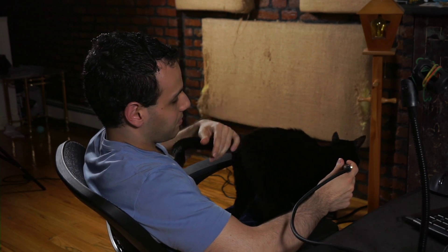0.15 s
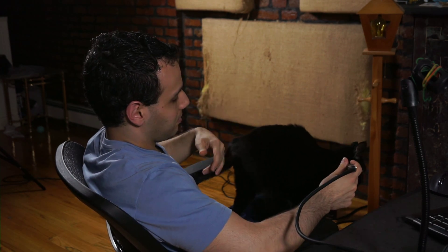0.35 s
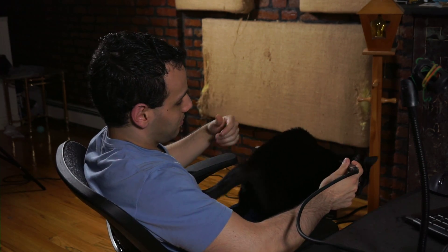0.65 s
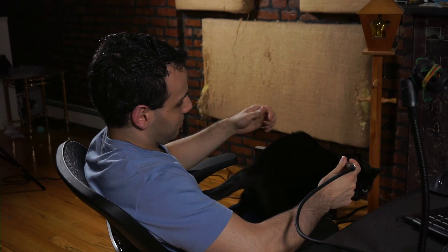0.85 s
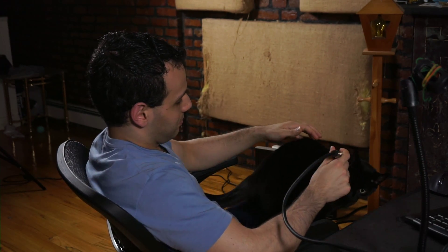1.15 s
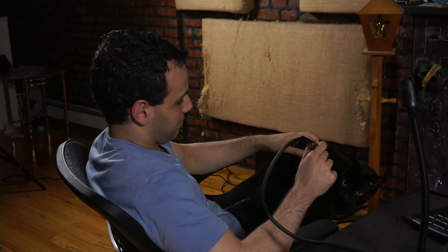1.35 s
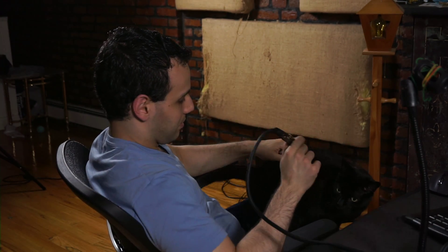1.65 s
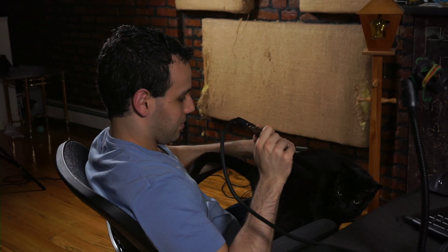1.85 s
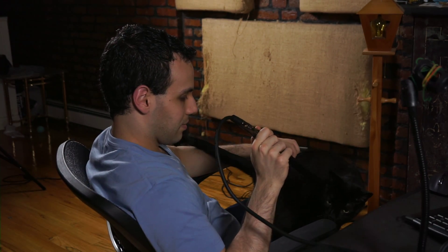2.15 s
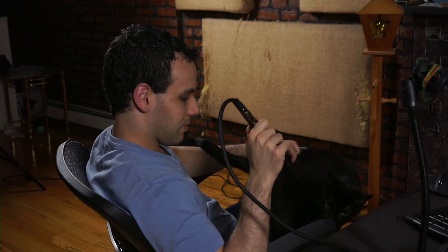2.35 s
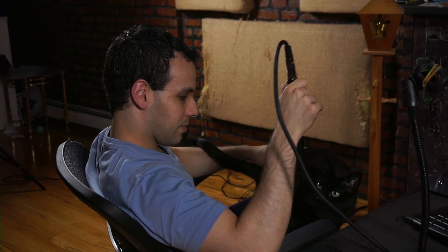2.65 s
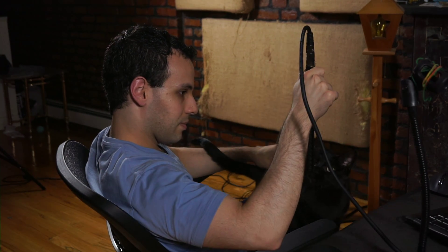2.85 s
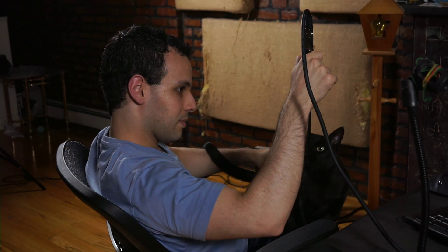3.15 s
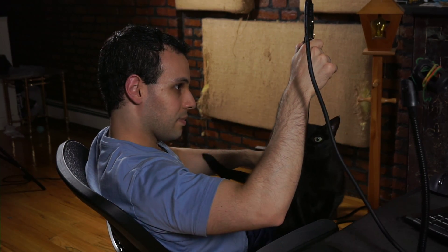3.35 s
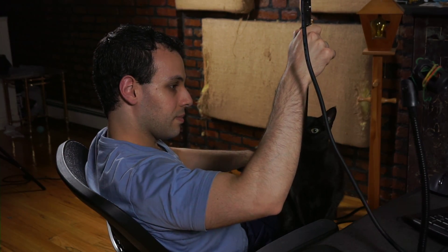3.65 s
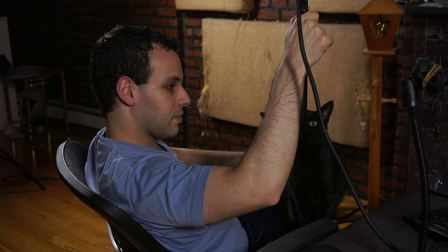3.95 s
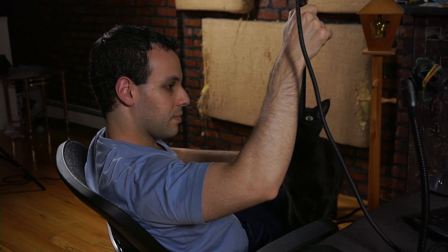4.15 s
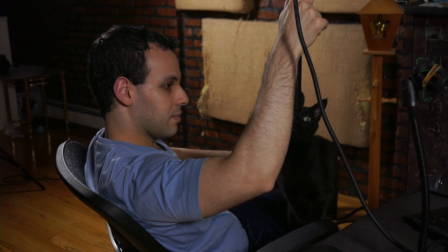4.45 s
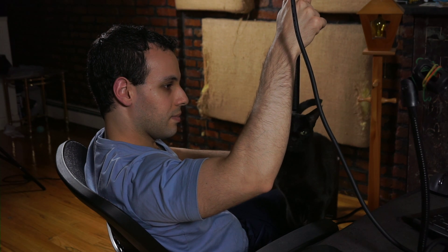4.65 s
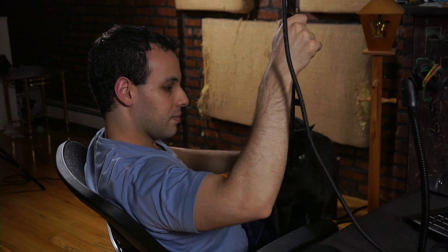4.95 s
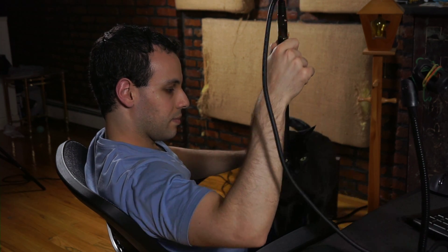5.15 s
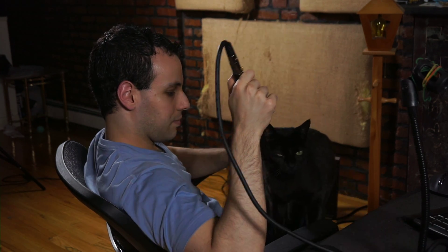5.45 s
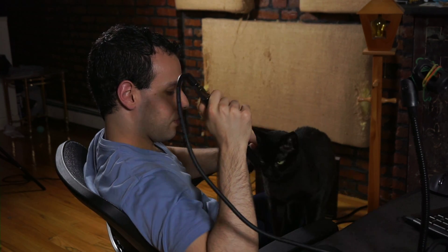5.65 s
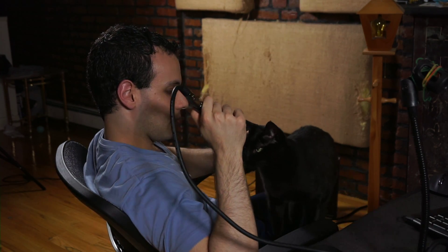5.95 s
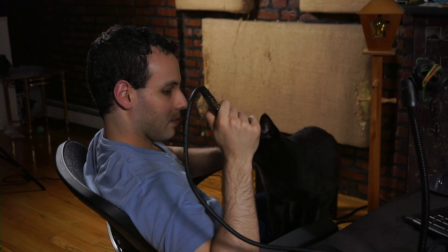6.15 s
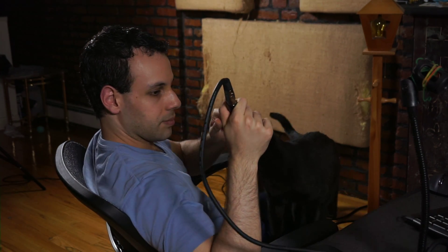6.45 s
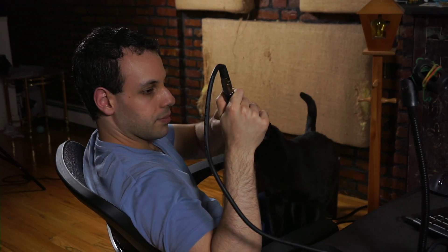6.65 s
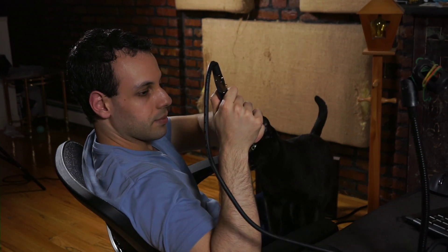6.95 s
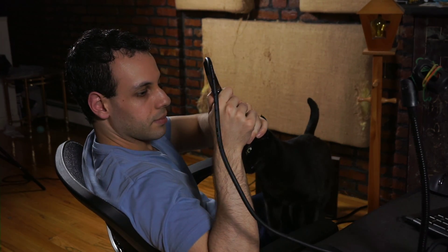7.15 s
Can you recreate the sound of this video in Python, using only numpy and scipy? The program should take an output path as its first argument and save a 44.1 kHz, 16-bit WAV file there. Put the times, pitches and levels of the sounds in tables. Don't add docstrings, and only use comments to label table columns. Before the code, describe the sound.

A handheld microphone brushes a cat's fur in a quiet room: soft rubbing, a hard bump and only faint purring at first. Pressed closer, the purr becomes a strong, rumbling flutter, alternating breath in and out. Three tiny squeaks come in quick succession, meeting a deep thud, then purring continues under shifting, scraping and final clicks and bumps.

```python
import sys
import numpy as np
from scipy import signal
from scipy.io import wavfile
from scipy.ndimage import uniform_filter1d, minimum_filter1d

SR = 44100
rng = np.random.default_rng(int(sys.argv[2]) if len(sys.argv) > 2 else 0)


def invert_db(x):
    u = np.asarray(x, float) / 20
    return 10 ** u


def wrap_up_sound(samples):
    columns = np.atleast_2d(samples).T
    tamed = np.clip(columns, -1, 1)
    steps = np.round(tamed * 32767).astype(np.int16)
    wavfile.write(sys.argv[1], SR, steps)


N = 322004


def evened(x):
    return x / np.sqrt(np.mean(x ** 2) + 1e-20)


def read(points, hz):
    f, value = np.transpose(points)
    return np.interp(np.log(hz + 1), np.log(f + 1), value)


def add(mix, s, sound):
    part = mix[round(s * SR):][:len(sound)]
    part += sound[:len(part)]


def resonate(x, hz, width):
    r = np.exp(-np.pi * width / SR)
    return 2 * signal.lfilter([1 - r], [1, -r * np.exp(2j * np.pi * hz / SR)], x + 0j).real


def band(x, lo_hz, hi_hz):
    return signal.sosfilt(signal.butter(2, [lo_hz, hi_hz], "band", fs=SR, output="sos"), x)


def noise(spectrum, size, patchy_db, flicker_db):
    frames, hz = 4 * N // size + 8, np.fft.rfftfreq(size, 1 / SR)
    a, b, patches = rng.standard_normal((frames, len(hz), 3)).T
    patches = evened(uniform_filter1d(uniform_filter1d(patches, 8, 0), 8, 1))
    flicker = evened(uniform_filter1d(rng.standard_normal(frames), 3))
    level_db = read(spectrum, hz)[:, None] + patchy_db * patches + flicker_db * flicker
    z = (a + 1j * b) * invert_db(level_db)
    return evened(signal.istft(z, nperseg=size, noverlap=size * 3 // 4)[1][:N])


def held(start, end, start_db, end_db, rest_db, rise_db_per_s, fall_db_per_s):
    t = np.arange(0, N + 64, 64)[:, None] / SR
    hold_db = start_db + (end_db - start_db) * np.clip((t - start) / (end - start), 0, 1)
    db = hold_db - rise_db_per_s * np.maximum(start - t, 0) - fall_db_per_s * np.maximum(t - end, 0)
    total_db = 10 * np.log10((invert_db(db) ** 2).sum(1) + invert_db(rest_db) ** 2)
    return np.interp(np.arange(N) / SR, t[:, 0], total_db)


def thump(t, hz, t60, ring_db, swell, slam):
    rise = swell * np.exp(-((t + .0035) / .0015) ** 2)
    dip = -slam * np.exp(-(t / .0014) ** 2)
    onset = 1 / (1 + np.exp(-(t + 0.00022) / 0.0035))
    ring = -np.cos(2 * np.pi * hz * t) * invert_db(ring_db - 60 * np.maximum(t, 0) / t60) * onset
    return rise + dip + ring * np.cos(np.pi / 2 * (t / t[-1]) ** 2)


def flutter(t, hz, width, overtone, phase):
    swing = 2 * np.pi * hz * t - phase
    wave = np.cos(swing) - overtone * np.cos(2 * swing)
    fade = np.cos(np.pi / 2 * t / t[-1]) * np.exp(-np.pi * width * t)
    return -wave * fade * (1 - np.exp(-t / 0.0033))


def purr(low_db, sway_db):
    # first pulse t/s, last pulse t/s, 1 = in and 0 = out, purr share of the low sound [0-1]
    breaths = [ (.4318, .6329, 0, .6), (.9927, 1.2591, 1, .6), (1.7364, 1.8583, 0, .6),
               (2.1669, 2.3273, 0, .7), (2.4590, 2.7264, 1, .75), (2.7501, 3.2308, 0, .995),
               (3.2500, 3.4379, 1, .995), (3.5006, 3.7901, 0, .995), (3.8050, 4.1505, 1, .99),
               (4.2138, 4.5015, 0, .995), (4.5600, 4.9042, 1, .85), (4.9305, 5.3400, 0, .93),
               (5.3798, 5.5260, 1, .8), (5.8055, 6.0083, 0, .98), (6.1300, 6.5099, 1, .9),
               (6.8261, 7.0690, 0, .85), (7.1071, 7.1815, 1, .8)]
    # soft flap level/dB, sharp flap level/dB, gated breath level/dB
    breath_tone = [(-27, -46, -45), (0.5, -33, -51), (-24, -18, -45), (-12, -35, -45), (4, -1.5, -30.5),
                   (-3, -26, -35.5), (-1.5, -18.5, -45), (-7.5, -47, -48), (-3.5, -14.5, -43),
                   (-10.5, -32, -53.5), (-23, -6, -18), (-17, -46, -34), (-19, -25, -44.5), (-8, -35, -47),
                   (-31, -43, -50), (-36, -27.5, -37.5), (-31, -27, -29)]
    # f/Hz, t60/s, ring level/dB, swell [ratio], slam [ratio]
    chest_modes = [(71.3, 0.056, 9, 1, 0.77), (73, 0.13, 12, 0.86, 2.6)]
    # f/Hz, width/Hz, overtone share [0-1]
    soft_edges = [(195.8, 76, 0.47), (417, 158, 0.034)]
    # f/Hz, width/Hz, level/dB
    throat_modes = [(770, 550, 9), (1303, 140, 8), (3760, 510, -6.5), (5870, 2300, -13.5),
                    (7800, 840, -20.5), (2220, 950, -15.5)]
    # lead/s, length/s, soft share of the edges [0-1], fade level/dB over the breath
    puffs = [(.002, 0.028, 0.34, -6), (.014, 0.029, 1.0, 0)]
    pulse_rates = (24.7, 26.2)
    second_flaps = (-10, -8)
    # row, pip level/dB
    wheeze = (14, -13)

    thumps, heave, soft, flaps, gate, pips, share = (np.zeros(N) for _ in range(7))
    t, short = np.arange(-600, 4400) / SR, np.arange(700) / SR
    for row, ((first, last, inward, part), tone) in enumerate(zip(breaths, breath_tone)):
        soft_db, flap_db, air_db = tone
        cycles, second_db = round((last - first) * pulse_rates[inward]), second_flaps[inward]
        pip_db = wheeze[1] if row == wheeze[0] else air_db - 8
        hz, *shape = chest_modes[inward]
        period, breath = (last - first) / cycles, np.zeros(N)
        flap_hz, width, overtone = soft_edges[inward]
        lead_s, puff_s, edges, fade_db = puffs[inward]
        for k, chance in enumerate(rng.standard_normal((16, 5))[:cycles + 1]):
            s = first + k * period + .0006 * chance[4]
            beat = thump(t, hz * (1 + 0.066 * chance[0]), *shape)
            add(breath, s + t[0], invert_db(.5 * chance[1]) * beat)

            reopen = s + (.34 + .19 * inward) * period + 0.00042 * chance[2]
            rattle = np.zeros(240)
            slap_at = [0, 95, 190] + rng.integers(0, 30, 3)
            rattle[slap_at] = [.22, 1, .3] * invert_db(1.5 * rng.standard_normal(3))
            edge_db = -4.0 * (k == 0) - 21.0 * (k == cycles)
            later = .0145 + .002 * chance[1]
            flap = flutter(short, flap_hz * (1 + .12 * chance[2]), width, overtone, .5 * chance[0])
            strength_db = 1.3 * chance[3]
            for lag, db in ((0, strength_db), (later, second_db + 3.7 * chance[4])):
                add(soft, reopen + lag - .0035, invert_db(soft_db + db + edge_db) * flap)
                add(flaps, reopen + lag - .0025, invert_db(flap_db + db + edge_db) * rattle)

            puff = signal.windows.tukey(round(puff_s * SR), min(edges, 1)) ** 2
            puff_db = air_db + fade_db * (2 * k / cycles - 1) + 2 * chance[0]
            add(gate, reopen - lead_s, invert_db(puff_db) * puff)

            pip_hz = 740 + 170 * np.sin(np.pi * k / cycles * .8)
            pip = np.sin(2 * np.pi * pip_hz * short * (.94 + 10 * short)) * np.hanning(len(short))
            add(pips, s - .009, invert_db(pip_db + chance[3] + edge_db) * pip)
        span = slice(round((first - .01) * SR), round((last + period) * SR))
        thumps += part * breath / np.std(breath[span])
        turns = (np.arange(N)[span] / SR - first) / period - .3
        heave[span] = part * np.sqrt(2) * np.cos(2 * np.pi * turns)
        share[span] = part
    thumps = signal.filtfilt(*signal.butter(1, 30, "high", fs=SR), thumps)
    throat = sum(invert_db(db) * resonate(resonate(flaps, f, w), f, w) for f, w, db in throat_modes)
    hiss = band(rng.standard_normal(N), 1000, 1350) * 4
    hiss = hiss + band(rng.standard_normal(N), 3580, 4150) * 0.93
    hiss = hiss + band(rng.standard_normal(N), 5500, 7300)
    voiced = thumps + invert_db(10.0) * soft + invert_db(23.5) * throat + invert_db(3.5) * gate * hiss + pips
    cat = invert_db(low_db) * voiced + invert_db(sway_db) * uniform_filter1d(heave, 400)
    return cat, uniform_filter1d(share, 600)


def squeaks():
    events = [
        (5.562, 0.076, 757, -12.5, 1.5, 0.84),
        (5.669, .064, 763, -13.5, 2.5, .75),
        (5.774, .028, 906, -16.5, -4.5, 1),
    ]
    # share of its length [0-1], pitch over lowest pitch [ratio], level/dB
    full = [(0, 1.72, -36), (.09, 1.5, -24), (.13, 1.27, -2), (.23, 1.03, -1), (.33, 1.0, .5),
            (.51, 1.1, -2), (.6, 1.48, -2.5), (.76, 1.6, -16), (1, 1.66, -42)]
    broken = [(0, 1.02, -21.5), (.25, 1.025, 0), (.45, 1.02, -13.5), (.54, 1.19, -26), (.7, 1.2, -6),
              (1, 1.2, -40)]
    # f/Hz, level/dB
    body = [(700, 1.5), (1600, 1.5), (2300, 1), (3100, -5.5), (3900, -11), (4600, -8.5), (5400, -17.5),
            (6500, -23), (9000, -40), (16000, -36.5)]

    out = np.zeros(N)
    for (start, length, low_hz, top_db, tilt_db, sounded), shape in zip(events, (full, full, broken)):
        at, *columns = np.transpose(shape)
        t = np.arange(0, sounded * length, 1 / SR)
        ratio, under_db = (uniform_filter1d(np.interp(t / length, at, c), 90, mode="nearest") for c in columns)
        hz, level_db = low_hz * ratio, top_db + under_db
        bright_db = tilt_db + 0.52 * under_db
        wobble = uniform_filter1d(rng.standard_normal((2, 4000))[:, :len(t)], 40)
        turns = np.cumsum(hz * (1 + 0.18 * wobble[0])) / SR
        shimmer_db = 4.7 * uniform_filter1d(rng.standard_normal((20, 4000)), 200)[:, :len(t)]
        tone = np.zeros(len(t))
        for k in range(1, 20):
            partial_db = read(body, k * hz) + bright_db * np.log2(k) + shimmer_db[k]
            tone += invert_db(partial_db) * (k * hz < 16000) * np.cos(2 * np.pi * k * turns + .7 * k * k)
        tone /= np.sqrt(uniform_filter1d(tone ** 2, 300))
        leak = band(rng.standard_normal(4000)[:len(t)], 1500, 9900)
        tone = tone * (1 + .8 * wobble[1]) + 0.044 * leak
        add(out, start, invert_db(level_db) * tone * signal.windows.tukey(len(t), .1))
    t = np.arange(5000) / SR
    echo = band(rng.standard_normal(5000), 450, 5000) * invert_db(-60 * t / 0.15)
    return out + invert_db(-39.0) * signal.oaconvolve(out, echo / np.linalg.norm(echo))[:N]


def handling(low_db, sway_db, share):
    # start t/s, end t/s, rub level/dB, scrape level/dB, hiss level/dB
    slides = [(0, -0.018, -39, -49, -56.5), (0.077, 0.333, -49.5, -63.5, -66),
              (0.468, 0.66, -53.5, -67, -71), (0.698, 0.919, -45.5, -54.5, -55),
              (0.992, 1.066, -50.5, -59, -60), (1.167, 1.245, -44, -63.5, -62.5),
              (1.605, 1.65, -68, -60, -75), (1.722, 1.773, -53, -53, -70.5),
              (1.841, 1.895, -55, -58.5, -61.5), (1.975, 1.968, -59, -53, -59),
              (2.016, 2.335, -60.5, -66.5, -69.5), (2.404, 2.413, -44.5, -51.5, -64.5),
              (2.492, 3.14, -64, -68, -68.5), (3.268, 3.434, -45, -70, -71.5),
              (3.59, 4.049, -72, -68.5, -76.5), (4.595, 4.855, -68, -65.5, -73.5),
              (5.317, 5.505, -75, -84, -74.5), (5.541, 5.539, -56, -50.5, -65.5),
              (5.76, 5.804, -64, -60, -61.5), (5.859, 5.952, -57, -73, -82.5),
              (6.02, 6.071, -47.5, -55.5, -55.5), (6.12, 6.352, -56, -64, -66.5),
              (6.74, 6.776, -49.5, -60.5, -69.5), (6.847, 6.9, -45.5, -46.5, -62.5),
              (6.914, 6.968, -35, -45.5, -65), (6.964, 7.108, -46, -41.5, -65),
              (7.15, 7.173, -37.5, -73, -64), (7.231, 7.219, -25.5, -33, -55),
              (7.258, 7.297, -39, -37, -55)]
    # rub level/dB, scrape level/dB, hiss level/dB
    slide_rest = (-59, -73, -77)
    # f/Hz, level/dB per Hz
    rumble_spectrum = [(18, -8), (30, -7.5), (65, 4.5), (92, 1.5), (288, -9.5), (423, -21), (495, -27.5),
                       (781, -37.5), (900, -56), (1170, -93), (1980, -120)]
    # f/Hz, level/dB
    rub_spectrum = [(150, -18.5), (250, 5), (398, 4.5), (490, -9), (715, -4.5), (954, -9), (1700, -24.5),
                    (2210, -45), (3740, -120)]
    # f/Hz, level/dB
    scrape_spectrum = [(880, -3.5), (1500, 0.5), (1900, -7.5), (2190, -3.5), (3460, -14), (4460, -6),
                       (4900, -18), (5630, -10), (6000, -29.5), (7800, -59), (13200, -120)]
    # f/Hz, level/dB
    hiss_spectrum = [(2940, -47.5), (5000, 1.5), (5300, -13.5), (5820, 5.5), (6520, 3), (12200, -0.5),
                     (13600, -1), (14100, -0.5), (14600, -4), (15600, -3), (16000, -5)]
    # start t/s, end t/s
    over_capsule = [(0, 1.33), (5.75, 6.4)]
    # start t/s, end t/s, f/Hz, width/Hz, level/dB
    whistles = [
        (0, 0.613, 4930, 250, -72.5),
        (1.726, 1.787, 2120, 88, -54),
        (1.798, 2.15, 2120, 59, -72),
        (5.403, 6.606, 624, 25.5, -68.5),
        (6.813, 7.3, 13300, 2600, -67),
    ]

    start, end, *levels = np.transpose(slides)
    rub_db, scrape_db, hiss_db = (held(start, end, db, db, rest_db, rise_db_per_s=498.5, fall_db_per_s=253.5)
                                  for db, rest_db in zip(levels, slide_rest))
    rumble = invert_db(low_db) * noise(rumble_spectrum, size=2048, patchy_db=4.0, flicker_db=-1.0)
    chest = evened(resonate(resonate(rumble / invert_db(low_db), 80, 45), 80, 90))
    pressed = np.clip(12 * (-minimum_filter1d(-share, 9000) - .9), 0, .95)
    rumble = (1 - pressed) * rumble + pressed * invert_db(low_db + 2.0) * chest
    sway = invert_db(sway_db) * evened(band(rng.standard_normal(N), 9.8, 62.4))
    out = np.sqrt(1 - share ** 2) * (rumble + sway)
    out = out + invert_db(rub_db) * noise(rub_spectrum, size=256, patchy_db=2.5, flicker_db=2.0)
    out = out + invert_db(scrape_db) * noise(scrape_spectrum, size=256, patchy_db=3.0, flicker_db=1.0)
    hiss = noise(hiss_spectrum, size=256, patchy_db=-0.5, flicker_db=2.1)
    t = np.arange(N) / SR
    brushed = sum((t > a) & (t < b) for a, b in over_capsule)
    capsule_peak = resonate(resonate(hiss, 14500, 500), 14500, 500)
    out = out + invert_db(hiss_db) * (hiss + 2.9 * brushed * capsule_peak)
    for start, end, hz, width, db in whistles:
        air = rng.standard_normal(N)[:round((end - start) * SR)]
        whistle = evened(resonate(resonate(air, hz, width), hz, width))
        add(out, start, invert_db(db) * whistle * signal.windows.tukey(len(air), .3))
    return out


def knocks():
    # t/s, dull level/dB, middle level/dB, bright level/dB, t60/s
    snaps = [(0.741, -55, -33, -46, 0.041), (0.772, -17.5, -49, -50, 0.017), (0.886, -58, -36, -43, 0.004),
             (1.622, -17.5, -30, -63, 0.019), (1.773, -38, -39, -61, 0.012), (2.095, -43, -46, -61, 0.07),
             (4.882, -36.5, -70, -73.5, 0.036), (6.27, -57.5, -70, -39, 0.02),
             (6.592, -64, -60, -76.5, 0.016), (6.768, -39, -37, -23.5, 0.026),
             (6.936, -24, -48, -38, 0.039), (6.978, -15, -48, -29.5, 0.0032),
             (7.167, -32, -53, -32.5, 0.0024), (7.227, -39.5, -48, -46.5, 0.012),
             (7.295, -15, -64, -38, 0.015)]
    # t/s, peak level/dB, f/Hz, t60/s
    bumps = [
        (0.773, 0, 120, 0.016),
        (1.601, -19, 104, 0.029),
        (2.39, -18, 91.5, 0.024),
        (2.628, -16, 89.6, 0.025),
        (5.768, 1, 80, .04),
        (6.596, -21.5, 350, 0.011),
        (6.743, -21, 70.5, 0.14),
        (7.17, -11, 75, 0.18),
        (7.288, -7, 90.3, 0.07),
    ]

    out, t = np.zeros(N), np.arange(6000) / SR
    for (s, dull_db, mid_db, bright_db, t60), grit in zip(snaps, rng.standard_normal((len(snaps), 6000))):
        fizz = grit * invert_db(-60 * t / t60)
        crack = .05 * fizz + (t == 0)
        dull = band(band(crack, 250, 1500), 100, 4000)
        middle = -band(band(crack, 1500, 4200), 1200, 4500)
        bright = band(fizz, 5000, 16000)
        parts = ((dull_db, dull), (mid_db, middle), (bright_db, bright))
        add(out, s, sum(invert_db(db) * p / abs(p).max() for db, p in parts))
    for s, db, hz, t60 in bumps:
        onset = np.sin(np.pi / 2 * np.minimum(t * hz / 0.53, 1)) ** 2
        add(out, s, -invert_db(db + 5.0 - 60 * t / t60) * np.cos(2 * np.pi * hz * t) * onset)
    return out


def room_noise():
    # f/Hz, level/dB
    room_spectrum = [(88, -54), (150, -16), (186, 9.5), (384, -1.5), (692, -24.5), (1460, -16),
                     (1950, -23.5), (2890, -24), (4630, -31), (15500, -45), (16100, -43)]
    return invert_db(-52.5) * noise(room_spectrum, size=1024, patchy_db=1.2, flicker_db=1.2)


def scene():
    # start t/s, end t/s, low level/dB at start, low level/dB at end
    presses = [(0.135, 0.31, -26, -32), (0.627, 0.757, -33.5, -20.5), (0.853, 1.06, -32, -36),
               (1.196, 1.216, -30.5, -26), (1.6, 1.6, -36, -36.5), (1.835, 1.87, -41.5, -56),
               (2.07, 2.093, -62, -34), (2.473, 2.695, -43.5, -39.5), (2.856, 3.15, -21.5, -18),
               (3.317, 3.444, -13.5, -15), (3.54, 3.783, -22, -27.5), (3.866, 4.152, -23, -20.5),
               (4.216, 4.318, -21.5, -18), (4.443, 4.823, -37.5, -54), (5.05, 5.5, -47, -41.5),
               (5.606, 5.73, -33.5, -32), (5.84, 6.003, -24, -16), (6.137, 6.447, -35.5, -38.5),
               (6.567, 6.6, -41, -34.5), (6.858, 6.983, -24, -25.5), (7.084, 7.14, -25, -19),
               (7.205, 7.255, -16, -25), (7.27, 7.317, -42, -28)]
    # start t/s, end t/s, sway level/dB
    lurches = [(0.637, .77, -35.5), (1.217, 1.31, -42), (1.434, 1.483, -33.5), (1.6, 1.62, -43),
               (1.856, 1.875, -38.5), (2.388, 2.46, -42), (2.61, 2.72, -44), (2.863, 3.22, -29.5),
               (3.294, 3.448, -21), (3.506, 3.66, -36), (3.85, 3.86, -26), (4.056, 4.18, -28.5),
               (4.2, 4.34, -31.5), (4.895, 4.922, -42.5), (5.435, 5.65, -40.5), (5.79, 5.763, -15),
               (5.998, 6.106, -25), (6.137, 6.296, -41.5), (6.559, 6.666, -34), (6.723, 6.883, -34.5),
               (7.077, 7.11, -29), (7.23, 7.228, -18), (7.29, 7.29, -27)]
    # f/Hz, width/Hz, level/dB
    tube = (2050, 14, -21)

    low_db = held(*np.transpose(presses), rest_db=-46.5, rise_db_per_s=148.5, fall_db_per_s=169)
    start, end, db = np.transpose(lurches)
    sway_db = held(start, end, db, db, rest_db=-49, rise_db_per_s=153.5, fall_db_per_s=255.5)
    cat, share = purr(low_db, sway_db)
    near = cat + handling(low_db, sway_db, share) + knocks() + squeaks()
    hz, width, ring_db = tube
    return (near + invert_db(ring_db + 9.5) * resonate(near, hz, width) + room_noise())[None]


def band_limit(x):
    return signal.sosfilt(signal.butter(12, 15840, fs=SR, output="sos"), x)


def record(dry):
    return band_limit(dry)


dry = scene()
out = record(dry)
wrap_up_sound(out)
```